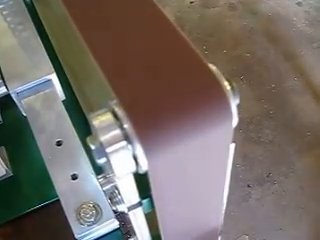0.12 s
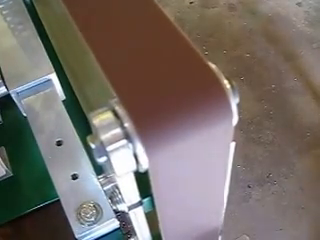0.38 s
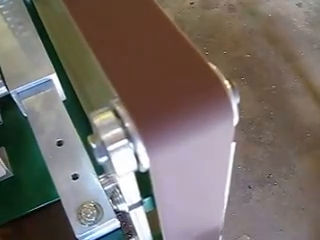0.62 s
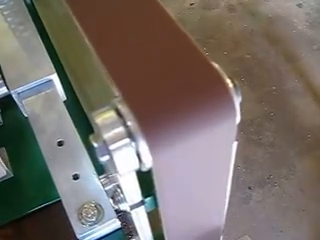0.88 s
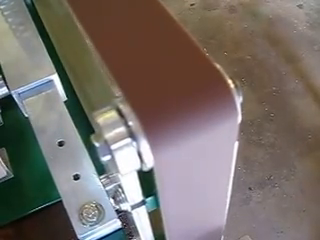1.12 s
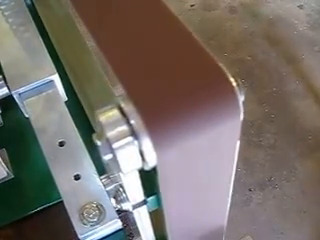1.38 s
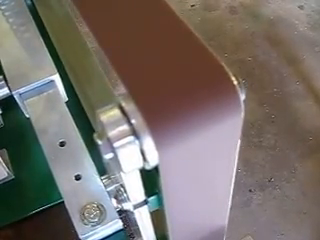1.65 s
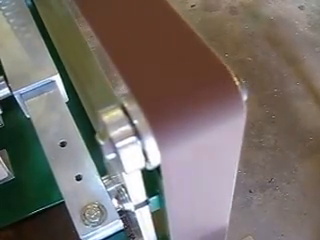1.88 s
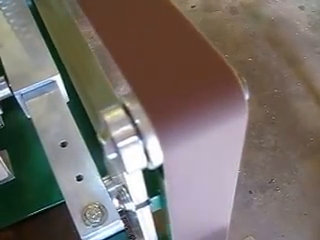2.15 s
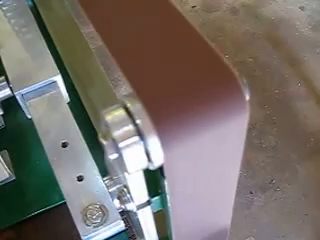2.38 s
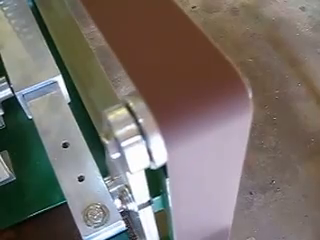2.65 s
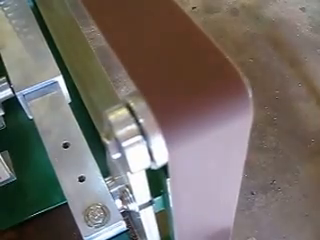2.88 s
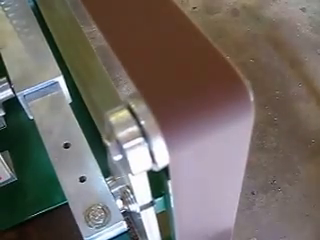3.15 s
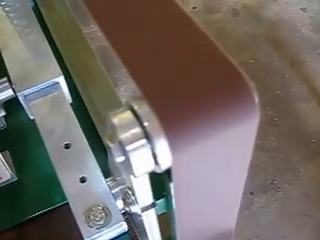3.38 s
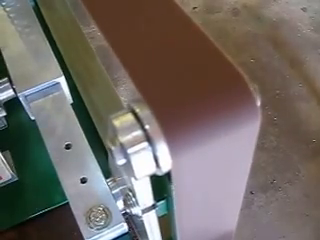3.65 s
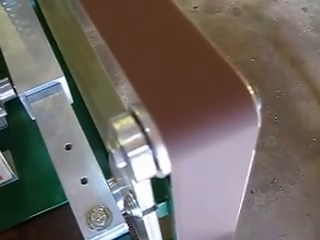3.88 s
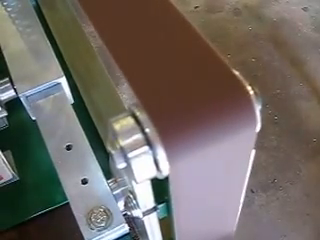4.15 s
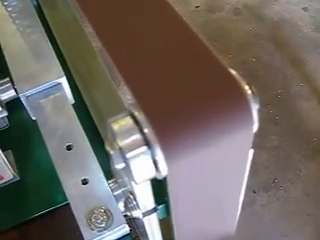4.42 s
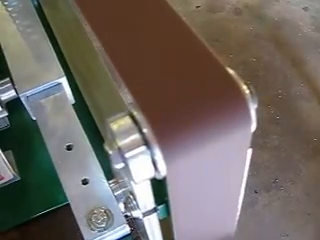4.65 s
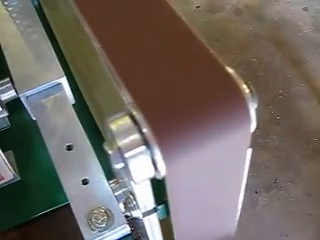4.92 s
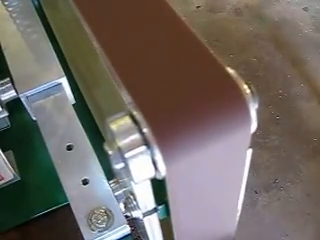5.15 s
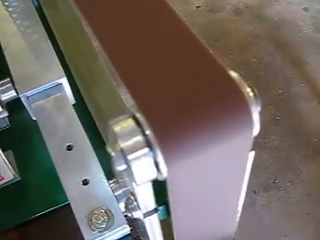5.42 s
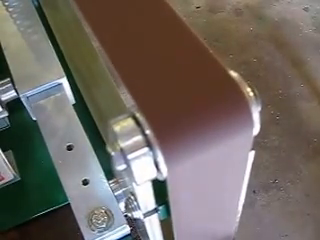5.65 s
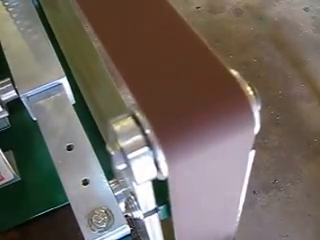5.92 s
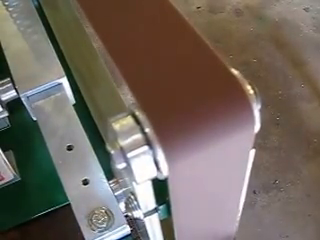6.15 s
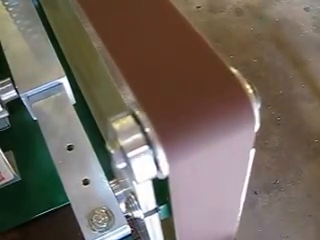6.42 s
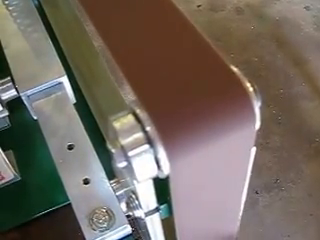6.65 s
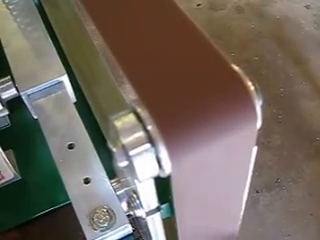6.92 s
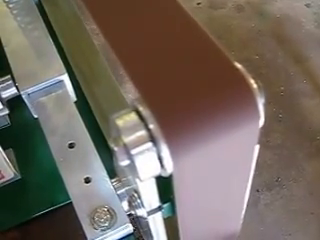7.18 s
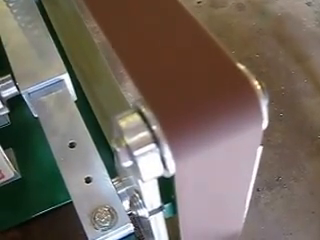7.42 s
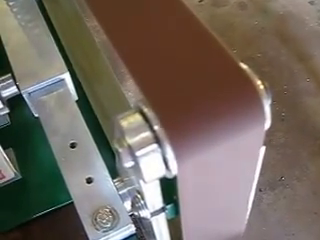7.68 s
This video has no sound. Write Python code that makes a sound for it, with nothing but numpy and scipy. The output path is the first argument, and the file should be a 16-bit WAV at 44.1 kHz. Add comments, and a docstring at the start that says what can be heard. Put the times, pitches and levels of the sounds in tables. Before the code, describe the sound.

From 0 to about 7.8 seconds a belt grinder idles close by in a workshop, already at full speed and never touching any work. The strongest sound is a hard, nasal electric whine, a cluster of tones mostly around 2.5 to 5.5 kilohertz with the loudest near 4, trembling and buzzing finely. Its pitch creeps up imperceptibly until about 3.6 seconds, then holds; individual tones gently swell and sink. Beneath it, gritty belt rasp cycles about ten times a second, with small blurred knocks and a rougher surge in each turn. Bright air and bearing hiss fills the gaps. A faint low rumble dips near 3.6 seconds and returns around 5. The small mono camera sound is dry, coarse and slightly metallic, with false high tones folded into the treble. It ends still running.

```python
"""Belt grinder idling in a workshop

Heard close by through a small mono camera, over a low rumble of the bench and shop floor.
The belt repeats its rasp and knocks as a looped noise pattern, and its whine as tones locked to the loop.
Air and bearing hiss is fresh filtered noise, pumped once a loop.
The camera samples slowly with no filter, so the treble folds down into tones that glide the other way."""
import sys
import numpy as np
from scipy import signal
from scipy.fft import rfft, irfft
from scipy.io import wavfile
from scipy.ndimage import map_coordinates

SR = 44100
rng = np.random.default_rng(int(sys.argv[2]) if len(sys.argv) > 2 else 0)


def inscribe(sig):
    """Save sig as 16-bit PCM at rate SR to the path in sys.argv[1].

    A 1-D sig is mono; a 2-D sig holds one channel per row.
    Samples are clipped to [-1, 1] before scaling.
    """
    pcm = np.round(np.clip(np.atleast_2d(sig).T, -1, 1) * 32767)
    wavfile.write(sys.argv[1], SR, pcm.astype(np.int16))


def gain_from_decibels(decibels):
    """Convert decibel values to linear amplitude factors."""
    exponent = np.asarray(decibels, float) / 20
    return 10 ** exponent


N = 343980   # length in samples

LOOP_HZ = 10.3156   # settled belt speed, loops per second
LOOP_SIZE = 8192   # points in one stored loop
RIPPLES = 18   # ripples of the whine per loop
CAMERA_RATE = 11024   # Hz


def at_hz(points, hz):
    """A spectrum read on a log frequency axis, as gain."""
    points = np.array(points)
    level_db = np.interp(np.log(np.maximum(hz, 1)), np.log(points[:, 0]), points[:, 1])
    return gain_from_decibels(level_db)


def drift(rate, count):
    """Smooth random curves, one per row: random points of spread 1, rate per second, joined by cosine fades."""
    points = rng.standard_normal((count, int(N / SR * rate) + 3))
    at = np.arange(N) / SR * rate
    left = at.astype(int)
    share = .5 - .5 * np.cos(np.pi * (at % 1))
    return points[:, left] * (1 - share) + points[:, left + 1] * share


def in_time(rows):
    """A curve of (time, value) rows read at every sample."""
    return np.interp(np.arange(N) / SR, *np.transpose(rows))


def belt_turns():
    """Belt angle in loops: the speed eases up to its settled value and hunts a little about it."""
    start_hz, settle_s = 10.308, 3.6
    hunt_hz, hunts_per_s = .0007, 2.5
    left = np.clip(1 - np.arange(N) / SR / settle_s, 0, 1)
    ease = .5 - .5 * np.cos(np.pi * left)
    hunt = hunt_hz * drift(hunts_per_s, count=1)[0]
    speed_hz = LOOP_HZ + (start_hz - LOOP_HZ) * ease + hunt
    return np.cumsum(speed_hz) / SR


# level of the shop rumble over time: time_s, level_db
RUMBLE_LEVEL = [(0.0, -51.5), (1.2, -50.5), (3.6, -56), (5.0, -50), (7.8, -52.5)]


def rumble():
    """Low noise of the bench and shop floor: band-passed noise that slowly rises and falls."""
    band = signal.butter(2, [70.0, 210.0], "band", fs=SR, output="sos")
    low = signal.sosfilt(band, rng.standard_normal(N))
    return gain_from_decibels(in_time(RUMBLE_LEVEL)) * low / low.std()


# spectrum of the air and bearing noise before its pumping and flutter: freq_hz, level_db_per_hz
HISS_SPECTRUM = [(40.0, -73.5), (130.0, -76.5), (330.0, -74), (730.0, -72.5), (1300.0, -72.5),
                 (1890.0, -71), (2410.0, -77.5), (2620.0, -70), (2930.0, -68), (3450.0, -67.5),
                 (4010.0, -66), (4350.0, -64.5), (4630.0, -68), (5220.0, -65.5)]
# bands of the hiss, each from the top of the one before: top_hz, pump_db (once a loop), flutter_db
HISS_BANDS = [(2300, 1.6, 1.8), (3750, 2.4, 1.6), (4700, 0.1, .3), (6000, 0.1, 1.0)]


def hiss(turns):
    """Air and bearing noise that never repeats: bands pumped once a loop, each fluttering on its own."""
    hz = np.fft.rfftfreq(N, 1 / SR)
    gain = at_hz(HISS_SPECTRUM, hz) * (hz < CAMERA_RATE / 2) * np.sqrt(SR / 2)
    pump = np.cos(2 * np.pi * (turns - .27))   # peaks at .27 of a loop
    noise = gain * rfft(rng.standard_normal(N))
    flutter = drift(16.0, count=len(HISS_BANDS))
    out, low_hz = 0, 0
    for k, (top_hz, pump_db, flutter_db) in enumerate(HISS_BANDS):
        band = irfft(noise * (hz >= low_hz) * (hz < top_hz), N)
        out = out + gain_from_decibels(pump_db * pump + flutter_db * flutter[k]) * band
        low_hz = top_hz
    overall_db = 0.37 * drift(1.7, count=1)[0]
    return gain_from_decibels(overall_db) * out


# splice and lumps meeting the wheels, levels before knock_db: place_loop_fraction, low_knock_db, high_knock_db
BELT_KNOCKS = [(0.069, 4.3, -1.5), (0.135, 3, 5), (0.158, 7.3, 4), (0.233, 2.6, 7), (0.288, 5, 5.5),
               (0.306, 8.6, 3), (0.346, 9.3, 9.5), (0.395, 1.2, 1), (0.413, 1.1, -4.5), (0.427, 1.1, -1.5),
               (0.55, 0.88, 1.5), (0.635, 5.1, 1.5), (0.677, 2.4, 4), (0.749, 3.1, 6)]


def one_loop(smooth_db, knock_db):
    """Spectrum of one belt loop relative to the rasp curve: grit noise, with knocks in the lower orders."""
    surge_start, surge_length, surge_db = .15, .2, 5.5   # loop fractions, dB: rough stretch after the splice
    hz = np.arange(LOOP_SIZE // 2 + 1) * LOOP_HZ
    noise = rng.standard_normal(LOOP_SIZE)
    since = (np.arange(LOOP_SIZE) / LOOP_SIZE - surge_start) % 1
    surge = gain_from_decibels(surge_db * np.exp(-(since / surge_length) ** 2))
    # both kinds of grit have unit power per order
    grit, rough = [rfft(v) / np.sqrt(LOOP_SIZE) / v.std() for v in (noise, noise * surge)]

    where, low_db, high_db = np.transpose(BELT_KNOCKS)
    signs = rng.choice([-1, 1], (len(BELT_KNOCKS), 2))
    delay = np.exp(-2j * np.pi * np.outer(hz / LOOP_HZ, where))   # sets each knock at its place
    low = delay @ (signs[:, 0] * gain_from_decibels(low_db))
    high = delay @ (signs[:, 1] * gain_from_decibels(high_db))
    knocks = gain_from_decibels(knock_db) * np.where(hz < 1800, low, high)

    smooth = gain_from_decibels(smooth_db) * np.where(abs(hz - 2150) < 350, grit, rough)   # no surge around 2150 Hz
    both = np.where(hz < 3700, smooth + knocks, grit)
    both[WHINE_ORDERS] = 0   # these orders belong to the whine
    return both / np.maximum(1, abs(both) / 1.4)   # caps the strongest orders, so none rings out as a tone


# spectrum of the belt noise before one_loop shapes it: freq_hz, level_db_per_hz
RASP_SPECTRUM = [(40.0, -75.5), (130.0, -76), (330.0, -69.5), (415.0, -73), (500.0, -68), (730.0, -71.5),
                 (1300.0, -70), (1890.0, -71.5), (2410.0, -70.5), (2620.0, -72), (2930.0, -68.5),
                 (3450.0, -60), (3930.0, -59.5), (4130.0, -64), (4350.0, -60), (4630.0, -65.5),
                 (5220.0, -61.5), (5840.0, -63), (6590.0, -63.5), (7420.0, -72), (8240.0, -65),
                 (9070.0, -72), (9890.0, -77.5), (10650.0, -77.5)]


def rasp(turns):
    """The same loop pattern comes round each time; a second one fades in and out as the belt wanders."""
    hz = np.arange(LOOP_SIZE // 2 + 1) * LOOP_HZ
    gain = at_hz(RASP_SPECTRUM, hz) * (hz < CAMERA_RATE) * (hz > 0) * np.sqrt(LOOP_HZ / 2) * LOOP_SIZE
    spectra = [one_loop(smooth_db=-3.5, knock_db=-19.0),
               gain_from_decibels(-8.0) * one_loop(smooth_db=-5.0, knock_db=-20.0)]
    place = (turns % 1) * LOOP_SIZE
    steady, wander = [map_coordinates(irfft(gain * s), [place], order=3, mode="grid-wrap") for s in spectra]
    return steady + drift(0.679, count=1)[0] * wander


def ripple_buzz(turns):
    """Gain that throbs slightly with each ripple of the belt."""
    buzz_db, peak = .3, .35   # peak in fractions of a ripple
    return gain_from_decibels(buzz_db * np.cos(2 * np.pi * (RIPPLES * turns - peak)))


# leading tones that swell and sink slowly: order_cycles_per_loop
LEAD_ORDERS = [412, 394, 376, 502, 466, 18, 48, 90, 14, 914, 932, 896, 573]
# their swells, in the same order: trend_db_per_s, swing_db, period_s, peak_s
LEAD_SWELLS = [(-.3, 1.0, 5, 1.6), (.1, 1.1, 3.3, 3.3), (0.13, 0.88, 6.2, 6), (-0.067, .5, 3.5, 2.1),
               (0.44, .5, 6.0, 5.2), (-0.47, 1.3, 7.7, .3), (-.5, 1.0, 3.1, 1.4), (-0.45, 1.5, 5.0, 1.2),
               (-0.67, 1.6, 2.4, 1.3), (.5, 1.3, 10, 2.5), (0.4, 1.2, 7.9, 5.3), (-0.65, 1.7, 5.9, .8),
               (-.6, 1.5, 8.6, 0.1)]


def lead_swell():
    """Level change in dB of each leading tone: a trend about the middle plus a slow swing."""
    time = np.arange(N) / SR
    swells = {}
    for order, (trend, swing_db, period, peak) in zip(LEAD_ORDERS, LEAD_SWELLS):
        swing = swing_db * np.cos(2 * np.pi * (time - peak) / period)
        swells[order] = trend * (time - N / SR / 2) + swing
    return swells


# tones of the whine, the overtones of the ripple and their side tones: order_cycles_per_loop
WHINE_ORDERS = [14, 18, 29, 36, 48, 54, 90, 100, 141, 169, 197, 232, 233, 251, 252, 269, 270, 282, 286, 287,
                288, 323, 324, 358, 359, 375, 376, 377, 380, 393, 394, 397, 403, 411, 412, 413, 416, 447,
                448, 452, 466, 472, 484, 501, 502, 503, 537, 538, 573, 663, 699, 716, 717, 735, 769, 788,
                875, 896, 913, 914, 915, 920, 931, 932, 933, 934, 950, 1020, 1021]
# their levels before swell and flutter, in the same order: level_db (rms)
WHINE_LEVELS = [-58.5, -59, -57.5, -58.5, -58.5, -56.5, -55.0, -56.0, -55.0, -54.1, -52.1, -51, -45.2,
                -45.1, -52, -42.6, -51.5, -48.7, -53, -42.4, -50, -43.7, -49, -43.3, -47.5, -45.5, -33.4,
                -41.8, -46.5, -38.9, -32.6, -47, -47, -40.5, -29.6, -47, -46.0, -47.5, -41.1, -46.1, -39.4,
                -43.9, -45.2, -40.8, -35.9, -41.7, -39.0, -40.3, -44.0, -38.8, -48.2, -48.2, -41.5, -46.5,
                -45.8, -48.4, -53.9, -47.5, -53.5, -44.7, -49.5, -54.5, -52.5, -48.8, -56.5, -55.4, -55.8,
                -57.0, -56.3]
# how much later each overtone peaks than the one below: overtone_of_ripple, lag_ripple_fraction
OVERTONE_LAG = [(2, .35), (12, .13), (21, .13), (26, .88), (32, 1.22)]
# side tones that make their louder neighbour swell, each at its own place: order: place_loop_fraction
SWELL_PLACE = {359: .63, 377: .93, 393: .34, 411: .45, 413: .81, 538: .87}


def whine(turns, lead_db):
    """Clean tones locked to the belt, roughly in step so each ripple is a pulse; side tones follow a leader."""
    jitter_cycles, side_lag_cycles = .015, .22
    levels = dict(zip(WHINE_ORDERS, WHINE_LEVELS))
    slow, quick = drift(.8, count=7), drift(11.0, count=5)
    jitter = jitter_cycles * drift(45, count=6)   # every tone trembles in phase
    overtone = np.arange(60)
    lag = np.cumsum(np.interp(overtone, *np.transpose(OVERTONE_LAG)) * (overtone > 0))
    scatter = .06 * rng.standard_normal(max(WHINE_ORDERS) + 1)
    out = np.zeros(N)
    for order, level_db in levels.items():
        # the leader is the loudest of the tone and its two neighbours
        leader = max((order, order - 1, order + 1), key=lambda o: levels.get(o, -np.inf))
        opposed = order < 3 * RIPPLES   # the lowest hums start half a cycle away
        start = .5 * opposed - lag[round(leader / RIPPLES)] + scatter[leader]
        if order != leader:
            if order in SWELL_PLACE:
                start += (leader - order) * SWELL_PLACE[order]
            else:
                start -= side_lag_cycles   # mostly bends the leader's pitch round the loop
        swell_db = lead_db.get(leader, 1.3 * slow[leader % 7])
        now_db = level_db + swell_db + 0.48 * quick[leader % 5]
        phase = order * turns + start + jitter[leader % 6]
        out += np.sqrt(2) * gain_from_decibels(now_db) * np.cos(2 * np.pi * phase)
    return out


def scene():
    """Belt angle in loops drives everything but the rumble."""
    turns = belt_turns()
    belt_noise = ripple_buzz(turns) * (rasp(turns) + hiss(turns))
    mono = belt_noise + whine(turns, lead_swell()) + rumble()
    return np.array([mono, mono])


def band_limit(x):
    """A steep low-pass at the top of the band."""
    return signal.sosfilt(signal.butter(12, 7120, fs=SR, output="sos"), x)


def record(dry):
    """Sampled unfiltered at the camera rate, then raised again by a short kernel that leaks mirror tones."""
    rounded = .345 * np.tanh(dry[0] / .305)   # the preamp rounds the sharpest knocks
    # it is lopsided too: the throb of the whine leaks into the bass
    square = rounded ** 2 - np.mean(rounded ** 2)
    lean = signal.sosfilt(signal.butter(2, 130, "high", fs=SR, output="sos"), square)
    rounded = rounded - .4 * lean

    slots = np.arange(int(N / SR * CAMERA_RATE) + 2) * SR / CAMERA_RATE
    coarse = map_coordinates(rounded, [slots], order=3, mode="nearest") - .0011   # small constant offset
    up, down = SR // 4, CAMERA_RATE // 4
    kernel = signal.firwin(16 * up + 1, CAMERA_RATE / 2, window=("kaiser", 9), fs=up * CAMERA_RATE)
    fine = signal.resample_poly(coarse, up, down, window=kernel)[:N]
    return band_limit(np.array([fine, fine]))


dry = scene()
out = record(dry)
inscribe(out)
```